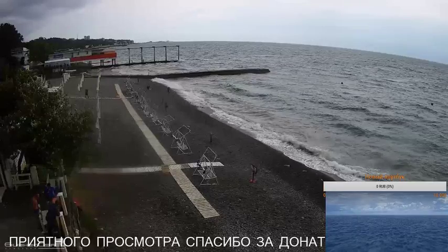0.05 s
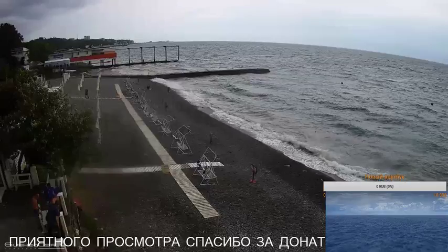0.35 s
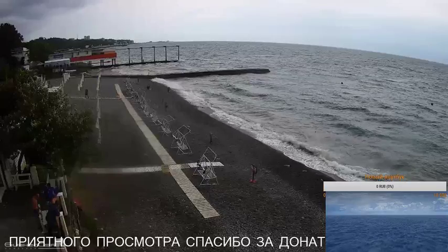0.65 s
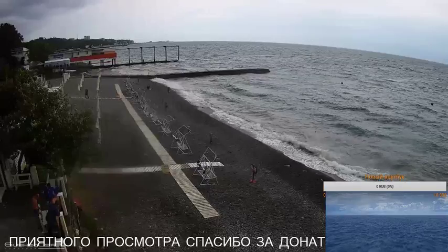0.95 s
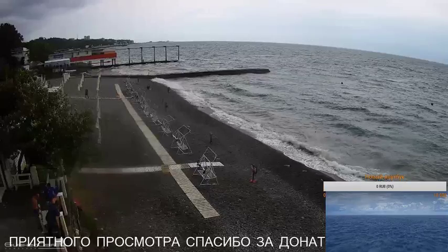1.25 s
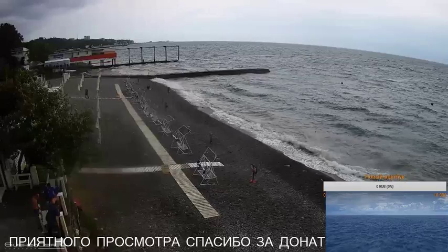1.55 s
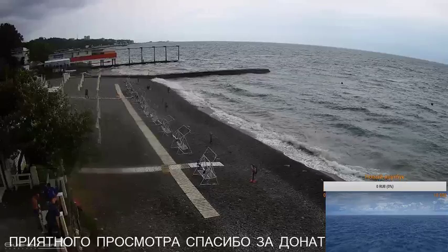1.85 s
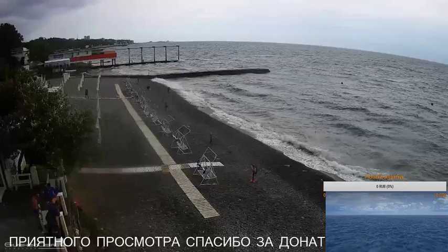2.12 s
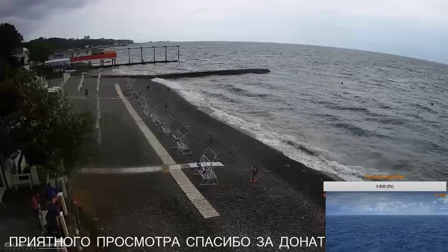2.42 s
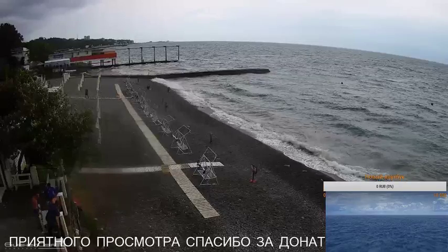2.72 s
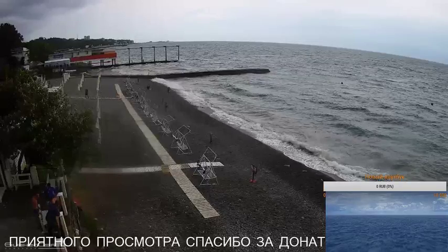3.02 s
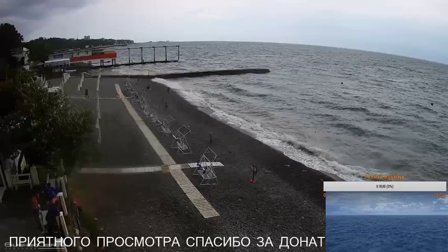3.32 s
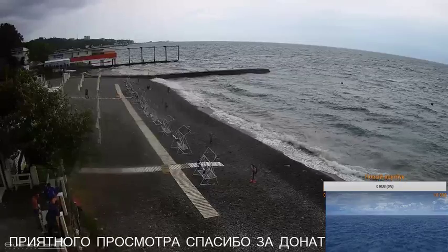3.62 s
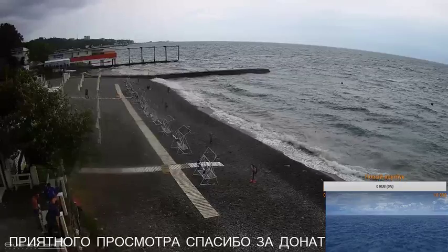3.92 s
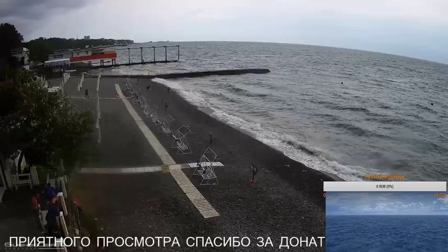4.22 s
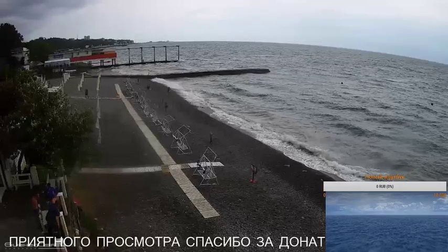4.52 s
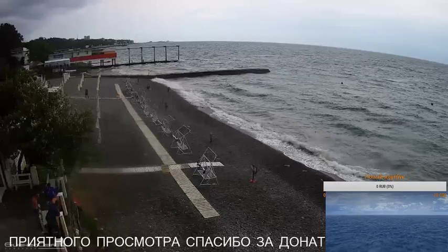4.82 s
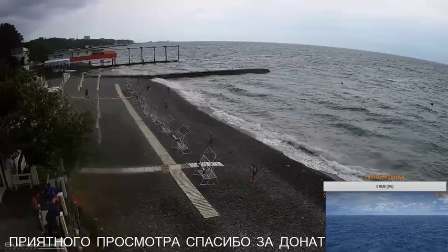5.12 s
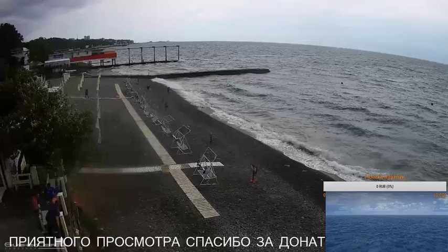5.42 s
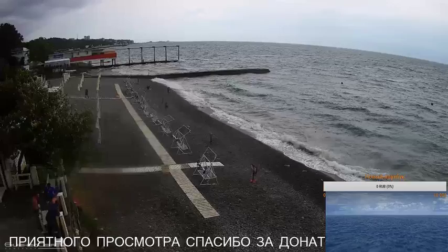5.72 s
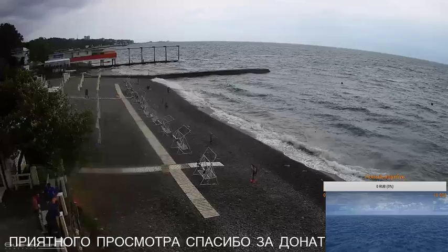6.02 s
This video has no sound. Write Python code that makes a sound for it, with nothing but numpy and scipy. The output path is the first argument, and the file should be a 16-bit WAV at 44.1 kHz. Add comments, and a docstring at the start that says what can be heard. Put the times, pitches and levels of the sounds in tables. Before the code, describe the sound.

Gusty wind rumbles and crackles hard on the microphone, over waves washing a pebble beach farther off.

```python
"""Gusty wind rumbles and sputters on a bare microphone, over surf washing a pebble beach far below.
Large eddies rock the air around the housing; small ones hit as dense, one-sided pressure spikes.
Wind across an edge hoots briefly. Each wave rolls pebbles, then hisses with bursting foam.
The narrow-band channel overloads on the hardest slaps and drops out once."""
import sys
import numpy as np
from scipy import signal
from scipy.fft import rfft, irfft
from scipy.io import wavfile
from scipy.ndimage import uniform_filter1d

SR = 44100
rng = np.random.default_rng(int(sys.argv[2]) if len(sys.argv) > 2 else 0)


def pcm_store(signal):
    """Save signal as 16-bit PCM."""
    levels = np.round(np.clip(np.atleast_2d(signal), -1, 1) * 32767)
    wavfile.write(sys.argv[1], SR, levels.astype(np.int16).T)


N = 276066
TIME = np.arange(N) / SR
BIN_HZ = np.fft.rfftfreq(N, 1 / SR)


def amp(db):
    """Decibels to gain."""
    return 10 ** (np.asarray(db) / 20)


def unit_rms(x):
    """Scale to rms 1."""
    return x / np.sqrt(np.mean(x ** 2) + 1e-20)


def noise(spectrum):
    """Noise of rms 1. Each spectrum row: frequency in Hz, relative density in dB."""
    hz, db = np.transpose(spectrum)
    gain = amp(np.interp(np.log(BIN_HZ + 1), np.log(hz), db))
    return unit_rms(irfft(rfft(rng.standard_normal(N)) * gain, N))


def wander(hz):
    """Random drift of rms 1, rolled off above hz."""
    return unit_rms(irfft(rfft(rng.standard_normal(N)) / (1 + (BIN_HZ / hz) ** 4), N))


def bell(t, width):
    """Gaussian bump of height 1 at t = 0."""
    return np.exp(-np.minimum((t / width) ** 2, 20))


def follow(curve):
    """Breakpoints to one value per sample."""
    return np.interp(TIME, *np.transpose(curve))


def low_pass(x, hz):
    """Steep band limit."""
    return signal.oaconvolve(x, signal.firwin(2047, hz, window=("kaiser", 9), fs=SR), "same")


def spikes(times_s, peaks, widths_s, leak_hz, steepness=0.94):
    """One-sided pressure spikes, quick rise, slower fall; the microphone's vent leaks their bass."""
    index = (times_s * SR).astype(int)[:, None] + np.arange(-50, 250)
    age = np.maximum((index / SR - times_s[:, None]) / (steepness * widths_s[:, None]) + 1, 0)
    pulses = peaks[:, None] * (age * np.exp(1 - age)) ** steepness
    train = np.bincount(np.clip(index, 0, N - 1).ravel(), pulses.ravel(), N)
    return irfft(rfft(train) * BIN_HZ ** 2 / (BIN_HZ ** 2 + leak_hz ** 2), N)


def wash_db(lag_s=0, steady_db=-29):
    """Waves run up the beach and drain away over a steady wash."""
    # Each row: crest time in s, relative level in dB, rise in s, fall in s.
    waves = [(1.62, -25.5, .45, .75), (2.3, -29.5, 0.42, 0.28), (4.92, -28, 0.24, .95)]
    power = amp(steady_db) ** 2
    for crest_s, db, rise_s, fall_s in waves:
        age_s = TIME - crest_s - lag_s
        swell = np.exp(-np.where(age_s < 0, (age_s / rise_s) ** 2, age_s / fall_s))
        power = power + amp(db) ** 2 * swell
    return 10 * np.log10(power)


def surf(roar_db=-27.0, pebbles_db=3.5, foam_db=-0.56, foam_lag_s=.25, churn_db=0.03, rattle_db=1.27):
    """The far shoreline roars steadily; nearer, pebbles roll and foam bursts just after."""
    # Each row: frequency in Hz, relative density in dB.
    roar_spectrum = [(30, -31), (120, -2), (380, -0.5), (700, -10.5), (1200, -12), (3000, -17), (6400, -43)]
    pebble_spectrum = [(200, -15.5), (700, -13), (1200, 0), (1800, -0.5), (2900, -2), (4000, -6),
                       (5000, -14), (6400, -27)]
    foam_spectrum = [(500, -20.5), (2000, -11.5), (3500, -7), (4900, 1.5), (5400, 0), (6400, -4.5)]
    pebbles = amp(wash_db() + pebbles_db + rattle_db * wander(hz=270)) * noise(pebble_spectrum)
    foam = amp(wash_db(foam_lag_s) + foam_db) * noise(foam_spectrum)
    roar = amp(roar_db) * noise(roar_spectrum)
    return roar + amp(churn_db * wander(hz=22)) * (pebbles + foam)


def rumble(wind_db, swirl_db=1.0, swirl_hz=8, flap_db=-23.5, flap_share=0.45):
    """Large eddies rock the air around the housing; mid-sized ones flap with the wind's strength."""
    # Each row: frequency in Hz, relative density in dB.
    flap_spectrum = [(40, -33), (150, -7), (300, -2), (480, 2), (750, -2), (1200, -10.5), (4000, -44.5)]
    rumble_spectrum = [(15, -47.5), (28, -23), (45, -12), (70, -6), (95, -3.5), (135, -1.5), (220, -2.5),
                       (350, -4), (600, -15.5), (4000, -62.5)]
    # Each row: time in s, level in dB.
    rumble_levels = [(0, -25.5), (0.35, -21), (1.1, -25.5), (1.5, -22.5), (2.3, -25), (3.4, -21),
                     (4.5, -24), (5.75, -23.5), (6.1, -26.5), (6.26, -36)]
    flap = amp(flap_db + flap_share * (wind_db - wind_db.mean())) * noise(flap_spectrum)
    deep = amp(follow(rumble_levels) + swirl_db * wander(swirl_hz)) * noise(rumble_spectrum)
    return deep + flap


def gusts_db(t, attack_s=.009, release_s=.012, sag_db=-0.88, lull_db=-4, lull_lag_s=.035, lull_s=.022):
    """Each gust jumps out of the breeze, sags, lets go and leaves a short lull."""
    # Each row: time in s, strength in dB.
    breeze = [(0, -20.0), (0.5, -21.0), (1.1, -22.0), (1.6, -18.5), (2.6, -23.5), (3.5, -23.5),
              (4.5, -24.5), (5.8, -24.0), (6.12, -29.0), (6.26, -43.5)]
    # Each row: start in s, length in s, strength in dB.
    gusts = [(0.088, 0.037, -15.5), (0.183, 0.061, -12.5), (0.312, 0.163, -11.5), (0.609, 0.186, -11.0),
             (0.867, 0.157, -15.0), (1.018, 0.06, -11.5), (1.163, 0.061, -15.0), (1.322, 0.088, -12.5),
             (1.444, 0.171, -16.0), (1.773, 0.046, -11.5), (1.925, 0.083, -12.0), (2.041, 0.134, -12.5),
             (2.249, 0.261, -19.0), (2.542, 0.025, -14.0), (2.664, 0.168, -13.0), (2.861, 0.24, -14.0),
             (3.18, 0.107, -12.0), (3.378, 0.108, -14.0), (3.494, 0.198, -18.0), (3.678, 0.083, -11.5),
             (3.866, 0.191, -15.5), (4.073, 0.123, -18.0), (4.217, 0.142, -20.0), (4.527, 0.029, -13.0),
             (4.727, 0.154, -17.5), (4.92, 0.131, -22.0), (5.528, 0.02, -14.0), (5.589, 0.159, -15.5),
             (5.829, 0.225, -16.0), (6.073, 0.076, -19.0)]
    start_s, length_s, db = np.transpose(gusts)[:, :, None]
    age_s = np.maximum(t - start_s, 0)
    attack = np.minimum(age_s / attack_s, 1)
    hold = amp(db + sag_db * np.minimum(age_s / length_s, 1))
    release = np.exp(-np.maximum(age_s - length_s, 0) / release_s)
    strongest = (attack * hold * release).max(0)
    lulls_db = lull_db * bell(t - start_s - length_s - lull_lag_s, lull_s).sum(0)
    breeze_db = np.interp(t, *np.transpose(breeze))
    return np.maximum(20 * np.log10(strongest + 1e-9), breeze_db + lulls_db)


def wind_strength_db(flutter_db=2.5, lurch_db=1.12, unrest_slope=0.251,
                     rise_s=0.002657, buffet_s=.014, slack_db=-4.5, slack_s=.009):
    """Gusts plus sharp buffets, the air going slack before each; light air flutters most."""
    # Each row: start in s, nominal surge in dB.
    buffets = [(0.466, 4.5), (0.636, 11), (0.842, 8), (0.9, 5), (2.392, 10), (2.444, 8), (2.634, 13),
               (2.671, 9.5), (2.717, 6.5), (2.808, 11), (2.875, 5), (2.936, 10), (2.971, 5.5), (3.025, 4),
               (3.155, 15), (3.342, 8), (3.531, 10), (3.726, 8), (3.775, 16.5), (3.879, 6.5), (3.945, 5),
               (3.98, 9), (4.175, 6), (4.292, 9), (4.376, 10), (4.731, 10.5), (4.925, 10), (4.988, 6),
               (5.766, 10), (5.92, 7.5), (5.935, 7), (5.997, 8.5), (6.023, 8), (6.15, 9)]
    t = TIME[::32]
    level_db = gusts_db(t)
    for start_s, surge_db in buffets:
        age_s = t - start_s
        surge = np.clip(age_s / rise_s, 0, 1) * bell(age_s, buffet_s)
        level_db += surge_db * surge + slack_db * bell(age_s + slack_s, slack_s)
    level_db = np.interp(TIME, t, level_db)
    unrest = amp(-unrest_slope * (level_db - level_db.mean()))
    return level_db + unrest * (flutter_db * wander(hz=55) + lurch_db * wander(hz=35))


def sputter(wind_db, count=5800, push_db=1.5, spread_db=6.5, ceiling=0.98,
            width_s=.00015, narrowing=0.32, width_scatter=0.2, crowding=.2):
    """Small eddies hit the microphone; the faster the eddy, the higher and narrower its spike."""
    size, sign, width, jitter = rng.standard_normal((count, 4)).T
    passed = np.cumsum(amp(crowding * wind_db))  # stronger wind carries more eddies past
    times_s = np.interp((np.arange(count) + .5 * jitter) / count, passed / passed[-1], TIME)
    push = amp(np.interp(times_s, TIME, wind_db) + push_db + spread_db * size)
    peaks = ceiling * np.tanh(push / ceiling) * np.sign(sign)
    widths_s = width_s * (push / 0.4) ** -narrowing * np.exp(width_scatter * width)
    return spikes(times_s, peaks, np.clip(widths_s, .00007, .0008), leak_hz=136)


def slaps(width_s=0.00011):
    """A few eddies strike the diaphragm head on, pushing or pulling it."""
    # Each row: time in s, peak pressure with full scale at 1.
    strikes = [(0.2704, 0.97), (0.3158, 1), (0.3352, 1.02), (.638, 1), (0.644, 0.72), (0.656, 1.02),
               (0.6721, 0.97), (0.6922, 1), (0.7021, 1), (0.726, 1), (0.8606, 0.93), (1.05, 1),
               (1.3696, 1.04), (2.675, 0.93), (2.7312, 0.96), (2.985, 1.025), (3.3469, .99), (3.594, 1),
               (3.7361, 1.06), (3.8815, .97), (3.9124, 1.02), (3.9567, 1.08), (4.1877, 1.2), (5.635, 1),
               (5.697, 1.04)]
    times_s, peaks = np.transpose(strikes)
    signs = rng.choice([-1, 1], len(times_s))
    return spikes(times_s, peaks * signs, np.full(len(times_s), width_s), leak_hz=40)


def diaphragm(pressure, slap, travel_limit=.88):
    """The diaphragm stiffens near the end of its travel; a slap pins it for an instant."""
    travel = pressure / (1 + (pressure / travel_limit) ** 8) ** (1 / 8)
    return slap + travel * np.maximum(1 - slap ** 2, 0)


def hoots(waver=0.056, waver_hz=250):
    """Wind catches an edge of the housing and sounds brief, unsteady notes."""
    # Each row: midpoint in s, length in s, pitch in Hz, rms level at the midpoint in dB.
    notes = [(1.023, 0.014, 500, -14.5), (1.057, 0.066, 1184, -16), (1.072, 0.017, 650, -21.5),
             (1.074, 0.017, 1340, -10.5), (1.085, 0.031, 1230, -16.5)]
    out = np.zeros(N)
    for middle_s, length_s, hz, db in notes:
        cycles = np.cumsum(hz * (1 + waver * wander(waver_hz))) / SR
        swell = np.cos(np.pi * np.clip((TIME - middle_s) / length_s, -.5, .5)) ** 2
        out += amp(db) * swell * np.sqrt(2) * np.sin(2 * np.pi * cycles)
    return out


def scene():
    """Wind and surf drive one diaphragm; mono."""
    wind_db = wind_strength_db()
    pressure = sputter(wind_db) + rumble(wind_db) + hoots() + surf()
    return diaphragm(pressure, slaps())[None]


def record(dry):
    """A narrow channel clips near full scale and drops out once; a wider band limit follows."""
    # Silent gap: start in s, end in s.
    dropout_s = (5.1118, 5.5295)
    clipped = np.clip(low_pass(dry[0], hz=6430), -.93, .93)
    live = (TIME < dropout_s[0]) | (TIME > dropout_s[1])
    gate = uniform_filter1d(1.0 * live, size=24)
    return low_pass(clipped * gate, hz=15900)[None]


dry = scene()
out = record(dry)
pcm_store(out)
```